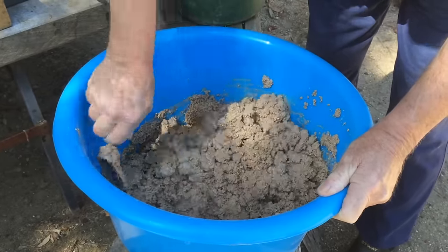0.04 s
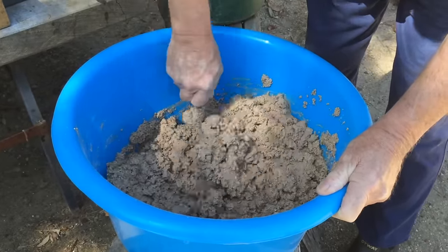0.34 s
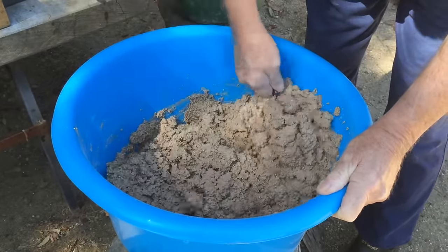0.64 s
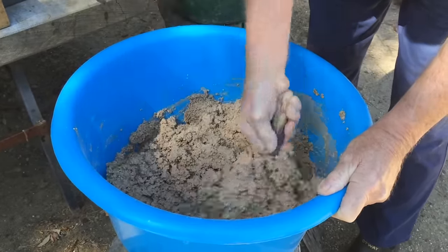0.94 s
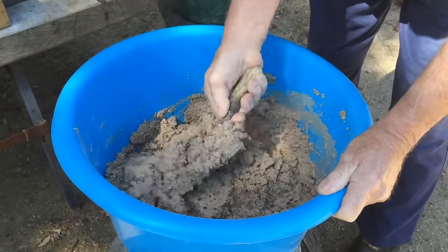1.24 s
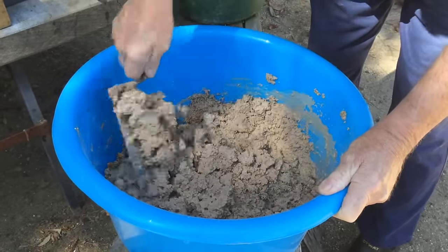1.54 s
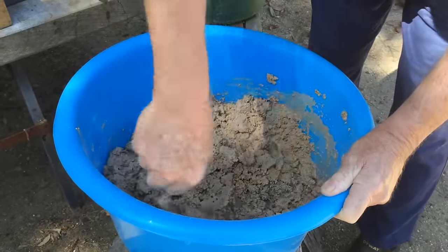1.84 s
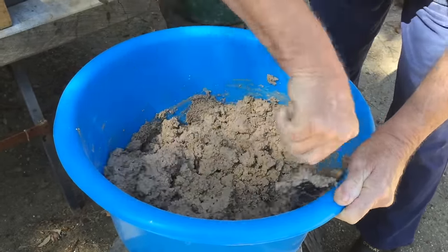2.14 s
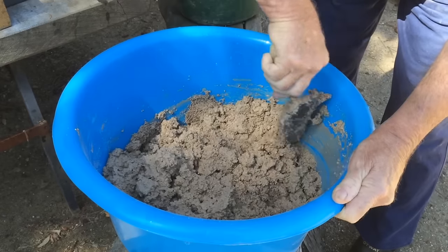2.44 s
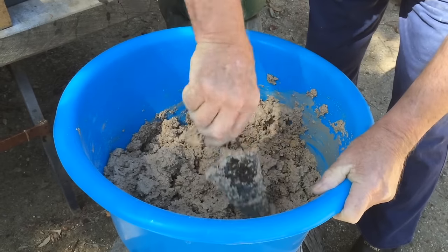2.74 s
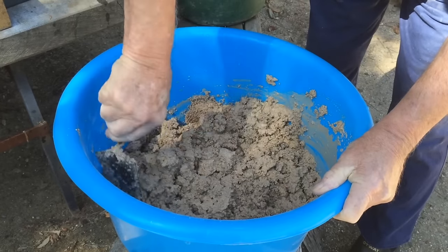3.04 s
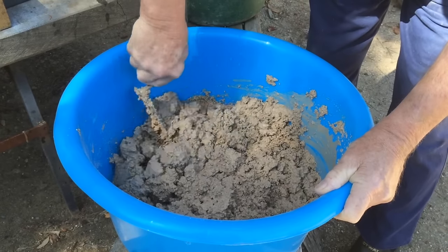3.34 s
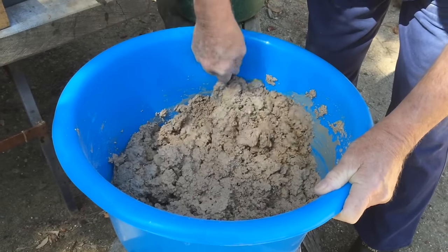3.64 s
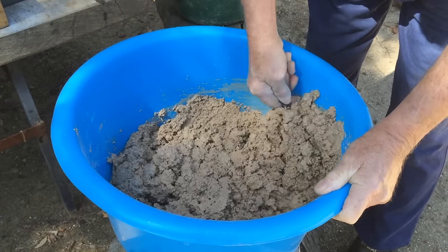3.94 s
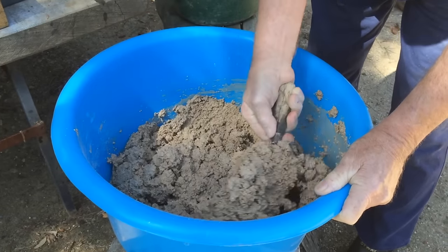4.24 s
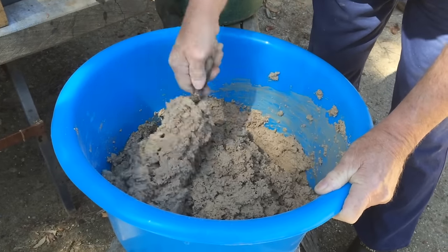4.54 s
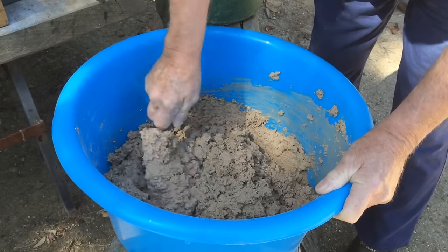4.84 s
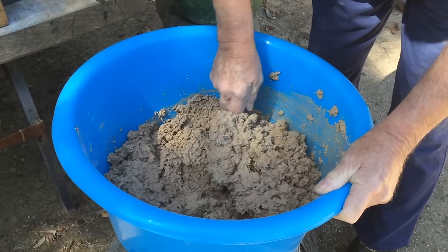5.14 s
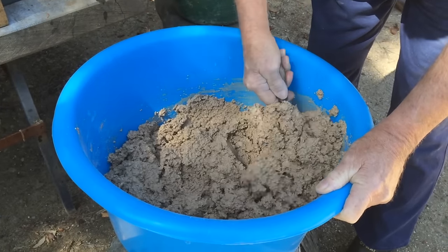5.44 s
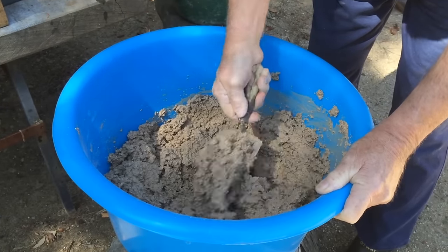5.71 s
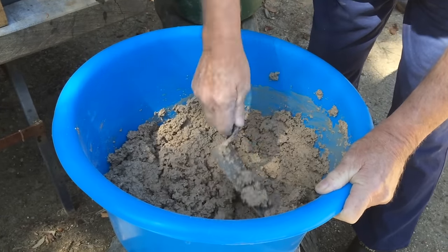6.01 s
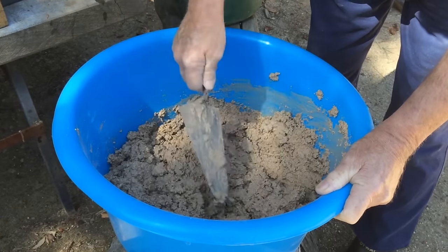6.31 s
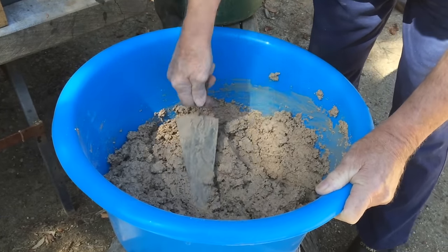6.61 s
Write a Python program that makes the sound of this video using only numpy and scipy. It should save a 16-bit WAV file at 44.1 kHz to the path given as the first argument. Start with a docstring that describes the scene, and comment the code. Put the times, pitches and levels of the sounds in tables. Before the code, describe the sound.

Close up in a quiet yard, a damp sandy mix crunches and hisses softly as a steel trowel turns it in a plastic bowl. The blade knocks the side near the start, then digs and scrapes in irregular pushes, drawing hollow tones from the plastic. Coarse grains snap, and crumbs patter down between strokes. Another clear knock lands shortly before the end. A faint distant rumble lies underneath.

```python
"""A steel trowel turns damp sand and cement in a plastic bowl, close up in a quiet yard.
Grains rush, crunch and snap along the blade; where it drags on the wall, the bowl adds hollow tones.
The edge knocks, catches and scrapes, and crumbs tick down when the blade tips its load.
A faint low rumble lies behind; both channels carry the same sound."""
import sys
import numpy as np
from scipy import signal
from scipy.fft import rfft, irfft, next_fast_len
from scipy.io import wavfile
from scipy.ndimage import uniform_filter1d, map_coordinates

SR = 44100
rng = np.random.default_rng(int(sys.argv[2]) if len(sys.argv) > 2 else 0)


def materialize(psi):
    """Save the field psi as 16-bit PCM at rate SR to the path in sys.argv[1].

    A 1-D psi becomes a single channel; in a 2-D psi each row is a channel.
    """
    bounded = np.clip(np.atleast_2d(psi).T, -1, 1)
    quanta = np.round(bounded * 32767).astype(np.int16)
    wavfile.write(sys.argv[1], SR, quanta)


N = 294131
TOP_HZ = 15420
# modes of the steel blade, damped by the mix: pitch_hz, width_hz, level_db
BLADE_MODES = [(4243, 40, -1), (4620, 45, -8), (4730, 50, -6), (4900, 40, -8), (5300, 60, -2),
               (5690, 45, -6), (6680, 50, -6), (7930, 40, -8)]
# tone of a bursting grain: frequency_hz, level_db
CRACK_SPECTRUM = [(100, -71), (400, 0), (1500, 11), (3200, 4), (7000, 5), (11000, 2), (15500, -1)]


def amp(db):
    """Decibels to gain."""
    return 10 ** (np.asarray(db) / 20)


def unit(x):
    """Scale to rms 1."""
    return x / np.sqrt(np.mean(x ** 2) + 1e-20)


def along(points, hz):
    """Read (frequency_hz, value) points on a log axis."""
    point_hz, values = np.transpose(points)
    return np.interp(np.log(hz + 1), np.log(point_hz), values)


def wobble(rate):
    """A smooth random curve, rate knots a second."""
    knots = rng.standard_normal(int(N * rate / SR) + 4)
    return unit(map_coordinates(knots, [np.arange(N) * rate / SR]))


def filtered(x, response):
    """x through a complex frequency response."""
    size = 2 * next_fast_len(x.shape[-1] // 2 + 4096)
    return irfft(rfft(x, size) * response(np.fft.rfftfreq(size, 1 / SR)), size)[..., :x.shape[-1]]


def coloured(x, spectrum):
    """x through a minimum-phase EQ with this spectrum."""
    def response(hz):
        cepstrum = irfft(np.log(amp(along(spectrum, hz))))
        half = len(cepstrum) // 2
        cepstrum[1:half] *= 2
        cepstrum[half + 1:] = 0
        return np.exp(rfft(cepstrum))
    return filtered(x, response)


def resonate(x, modes):
    """x through (pitch_hz, width_hz, level_db) resonances; neighbours swing in opposite senses."""
    def response(hz):
        return sum((-1) ** k * amp(db) * 1j * hz * width / (pitch ** 2 - hz ** 2 + 1j * hz * width)
                   for k, (pitch, width, db) in enumerate(modes))
    return filtered(x, response)


def add(track, start_s, sound):
    """Mix a sound into the track."""
    start = max(round(start_s * SR), 0)
    track[start:start + len(sound)] += sound[:max(N - start, 0)]


def grains(per_s, spread_db):
    """Random tiny impacts: many small ones and a few large."""
    size = amp(spread_db * np.minimum(rng.exponential(size=N), 4))
    return unit((rng.random(N) < per_s / SR) * size * rng.choice([-1, 1], N))


def crunch(per_s, spread_db, rush_db):
    """Distinct grains over the even rush of countless finer ones."""
    return unit(grains(per_s, spread_db) + amp(rush_db) * rng.standard_normal(N))


def effort(attack_s=0.012, release_s=0.024, brake_s=0.038, restart_s=0.0051):
    """Envelopes of sand, fine grit and wall rubbing: travel plus pushes, ducked as the blade rests."""
    # the blade's steady travel round the bowl: time_s, sand_db, fine_db
    travel = [(0, -70, -63.5), (0.1, -68.5, -77), (0.3, -59.5, -63.5), (1.12, -59, -64), (1.38, -67, -62.5),
              (1.68, -65.5, -65.5), (1.87, -49, -56), (2.7, -62.5, -69.5), (2.96, -62.5, -62.5),
              (3.2, -59, -61), (3.45, -56, -68.5), (4.35, -59.5, -89), (4.62, -60, -60.5),
              (4.8, -63.5, -78), (4.92, -61, -70), (5.75, -57, -63), (6.03, -68, -72), (6.17, -60.5, -60),
              (6.54, -74, -71), (6.67, -62.5, -66)]
    # shoves into the heap: start_s, length_s, sand_db, swell_db, fine_over_sand_db, wall_over_sand_db
    pushes = [(0.126, 0.076, -55.5, 11.5, -5, -3.5), (0.24, 0.2, -58.5, -1.5, -5, 3),
              (0.63, 0.15, -54.5, 0, -19, -3.5), (0.793, 0.292, -58, 3.5, -2, -2),
              (1.732, 0.2, -55, 10, -2.5, 3), (2.007, 0.16, -49.5, -0.5, -2, -0.5),
              (2.17, 0.23, -45.5, 0, -6.5, -10), (2.423, 0.13, -51.5, -5, -8, -10),
              (3.274, 0.042, -59.5, -6, 5, 9.5), (3.483, 0.405, -52.5, 4, -6, 1.5),
              (3.896, 0.17, -55, -1, -20, 0), (5.153, 0.18, -63, -2, -3, -0.5),
              (5.437, 0.11, -56, -2, -12, -5), (5.821, 0.084, -55, -1, -6, -27)]
    # the blade comes to rest: start_s, end_s, duck_db
    stalls = [(0.214, 0.247, -12), (2.85, 2.897, -9.5), (6.377, 6.536, -15)]
    t = np.arange(N) / SR
    time_s, sand_db, fine_db = np.transpose(travel)
    sand, fine = amp(np.interp(t, time_s, sand_db)), amp(np.interp(t, time_s, fine_db))
    wall = sand * amp(-2)
    power = np.array([sand, fine, wall]) ** 2
    for start, length, db, swell_db, fine_over_db, wall_over_db in pushes:
        age = t - start
        press = np.clip(np.minimum(age / attack_s, 1 + (length - age) / release_s), 0, 1)
        push = press * amp(db + swell_db * (np.clip(age / length, 0, 1) - 0.5))
        power += np.outer(amp([0, fine_over_db, wall_over_db]), push) ** 2
    duck_db = sum(db * np.clip(np.minimum((t - start) / brake_s, (end - t) / restart_s), 0, 1)
                  for start, end, db in stalls)
    return np.sqrt(power) * amp(duck_db)


def stirring(sand_gain, fine_gain, wall_gain):
    """The mix gives way in clumps; each clump sheds grains on the blade and tugs at the bowl."""
    # how much the blade crushes rather than slides: time_s, grains_over_rush_db
    coarseness = [(.4, -2), (.8, -8), (1.1, -7), (1.3, 1), (1.95, 1), (2.4, -5), (2.9, 0), (3.9, -1),
                  (4.15, -10), (4.45, -9), (4.6, 0), (5.8, -3), (6.2, -8)]
    # tones of sliding sand and of fine grit: frequency_hz, level_db
    sand_spectrum = [(300, -35), (900, -20.5), (1600, -4), (2400, 2.5), (3100, 2), (4500, 1.5), (6800, 1),
                     (9000, -3.5), (12000, -9), (15500, -7.5)]
    fine_spectrum = [(2500, -18), (6000, 2), (9000, 0.5), (11500, -3), (15500, -8.5)]
    # the wall's hollow tones under the rubbing edge: pitch_hz, width_hz, level_db
    wall_modes = [(253, 57, -10.5), (599, 156, -6), (770, 110, -4), (917, 170, -4), (1297, 203, -2.5),
                  (1564, 138, -2), (1894, 390, -4.5)]
    coarse_db = np.interp(np.arange(N) / SR, *np.transpose(coarseness))
    clumps, slips = wobble(70), wobble(420)
    flow = unit(amp(0.82 * clumps + 0.5 * slips))
    sliding = flow * crunch(per_s=1500, spread_db=4.5, rush_db=-coarse_db)
    sand = unit(coloured(sliding, sand_spectrum)) + amp(-28) * unit(resonate(sliding, BLADE_MODES))
    sifting = flow * crunch(per_s=3000, spread_db=-2, rush_db=-7 - coarse_db)
    fine = unit(coloured(sifting, fine_spectrum))
    tug = amp(clumps + 0.51 * slips)
    rubbing = tug * crunch(per_s=700, spread_db=2.5, rush_db=-coarse_db)
    wall = unit(resonate(rubbing, wall_modes))
    return sand_gain * sand + fine_gain * fine + amp(-3.5) * wall_gain * wall + ploughing(tug)


def crumbs(sand_gain, typical_db=-73, follow=0.32):
    """Loose crumbs tumble off the blade and patter, a little louder when more sand moves."""
    patter = unit(coloured(grains(per_s=120, spread_db=1), CRACK_SPECTRUM))
    return amp(typical_db) * (sand_gain / np.median(sand_gain)) ** follow * patter


def shifting(x, depth_db=2):
    """As the blade turns and the heap changes shape, patches of the spectrum swell and fade."""
    spectra = signal.stft(x, nperseg=512)[2]
    patches = uniform_filter1d(rng.standard_normal(spectra.shape), size=6, axis=0)
    patches = uniform_filter1d(patches, size=9, axis=1)
    gain = unit(amp(depth_db * unit(patches)))
    return signal.istft(spectra * gain, nperseg=512)[1][:N]


def reflections(x, predelay_s=0.005):
    """Nearby walls answer with a short tail, longest in the lows."""
    # decay of the yard: frequency_hz, t60_s
    decay = [(200, 0.3), (1500, 0.084), (10000, 0.095)]
    hz, t, spectra = signal.stft(rng.standard_normal(SR // 3), SR, nperseg=256)
    tail = signal.istft(spectra * amp(-60 * t / along(decay, hz)[:, None]), SR, nperseg=256)[1]
    tail = np.r_[np.zeros(round(predelay_s * SR)), tail]
    return signal.fftconvolve(x, tail / np.linalg.norm(tail))[:N]


def yard():
    """A steady bed of distant rumble with a little hiss."""
    # tone of the yard's air: frequency_hz, level_db
    air_spectrum = [(20, -25.5), (35, -11), (50, -10.5), (72, 3), (100, -7), (150, -14.5), (300, -17),
                    (600, -20), (1200, -31), (2600, -31.5), (7000, -39.5), (15500, -43)]
    return amp(-65.5) * unit(coloured(rng.standard_normal(N), air_spectrum))


def catches(wall_gain, per_s=12, length_s=0.06, centre_hz=1360, scatter=0.1, width_hz=220):
    """Cues for light scrapes: the edge catches by chance, as strongly as it rubs the wall just then."""
    slots = np.arange(int(per_s * N / SR))
    chance = rng.random((len(slots), 2))
    times = (slots + chance[:, 0]) / per_s
    pitches = centre_hz * np.exp(scatter * (2 * chance[:, 1] - 1))
    return [(start, length_s, 20 * np.log10(wall_gain[int(start * SR)]) - 8.5, hz, width_hz)
            for start, hz in zip(times, pitches)]


def scrapes(wall_gain, fade_s=0.002):
    """Brief stick-slip bursts, each in the band that the edge's angle picks; the blade sings along."""
    # the edge judders along the wall: start_s, length_s, level_db, centre_hz, nominal_width_hz
    cues = [(0.252, 0.01, -49, 8100, 500), (0.247, 0.023, -49.5, 12000, 7000),
            (0.732, 0.0235, -49, 1660, 1200), (1.857, 0.052, -56.5, 653, 70),
            (2.021, 0.025, -53.5, 695, 90), (2.073, 0.0089, -47, 1920, 400),
            (2.213, 0.019, -48, 1800, 1400), (2.329, 0.015, -45.5, 2400, 2200),
            (2.358, 0.033, -34, 5160, 4170), (2.359, 0.034, -45, 1800, 696),
            (2.361, 0.075, -44.5, 11600, 8100), (2.541, 0.016, -48.5, 1460, 900),
            (2.899, 0.016, -62, 1750, 500), (3.002, 0.031, -48.5, 1490, 800),
            (3.506, 0.029, -44, 6030, 1610), (3.509, 0.024, -48.5, 1180, 1000),
            (3.562, 0.1, -58, 1400, 280), (3.707, 0.058, -54, 1360, 450), (3.871, 0.015, -48, 5600, 8950),
            (5.186, 0.031, -51, 2050, 600), (5.495, 0.085, -61, 1500, 400), (5.778, 0.069, -65, 1290, 160)]
    out = np.zeros(N)
    judder = rng.standard_normal(N) * amp(1.1 * wobble(600))
    for start, length, db, centre_hz, width_hz in cues + catches(wall_gain):
        t = np.arange(int((length + 0.03) * SR)) / SR
        press = np.clip(np.minimum(t, length - t) / fade_s, 0, 1)
        slipping = press * judder.take(round(start * SR) + np.arange(len(t)), mode="wrap")
        band = [(centre_hz, 1.4 * width_hz, 0)]  # set wide, as two passes narrow it
        rasp = resonate(resonate(slipping, band), band)
        rasp = rasp + amp(2) * resonate(rasp, BLADE_MODES)
        add(out, start, amp(db) * rasp * np.linalg.norm(press) / np.linalg.norm(rasp))
    return out


def crack(t60_s):
    """A grain bursts in a bright puff of noise."""
    t = np.arange(SR // 5) / SR
    puff = coloured(rng.standard_normal(len(t)) * amp(-60 * t / t60_s), CRACK_SPECTRUM)
    return puff / np.sqrt(np.sum(puff ** 2) / (t60_s * SR)) / 10


def snaps():
    """Single coarse grains click between steel and plastic."""
    # grains snapping under the blade: start_s, level_db
    cues = [(0.0782, -42), (1.641, -42), (1.991, -28.5), (2.217, -33), (2.381, -40), (2.9006, -43),
            (3.365, -38), (3.981, -41), (6.542, -40)]
    out = np.zeros(N)
    for start, db in cues:
        add(out, start, amp(db) * crack(t60_s=0.0092))
    return out


def knocks(t60_cycles=15.2, attack_s=0.00027, rebound_s=0.0032, rebound_pitch=0.782):
    """A blow slaps the wall, rings the bowl and crushes grit; the springy blade lands again, softer."""
    # blade hits, levels ahead of the mix trims below:
    # start_s, slap_db, pitch_hz, ring_db, hardness_hz, grit_db, rebound_db
    hits = [(0.204, -13.5, 805, -16.5, 670, -31, -14.5), (0.2489, -31, 925, -34, 450, -33, -11),
            (0.2901, -39, 905, -36, 900, -35, -12), (0.3208, -26.5, 1640, -28, 800, -50, -11),
            (0.384, -33, 1070, -35.5, 500, -47, -3), (0.722, -30, 1700, -31, 700, -29, -17),
            (0.761, -39, 520, -36, 400, -51, -22), (1.073, -36.5, 774, -67, 1200, -43, -15),
            (1.7775, -44, 493, -48, 600, -31, -12), (1.839, -32, 1650, -50, 1500, -46, -15),
            (1.932, -31, 1190, -45, 1500, -50, -10), (2.051, -37, 620, -44, 700, -38, -16),
            (3.0054, -23.5, 1820, -29.5, 800, -29, -7.5), (3.270, -37, 1440, -30.5, 400, -34.5, -9),
            (3.4852, -28, 620, -27.5, 1700, -48, -20), (3.5667, -33, 1890, -35.5, 800, -40, -4),
            (4.0382, -27, 1390, -51, 2000, -37, -17), (4.0495, -22.5, 1350, -51, 2000, -51, -12),
            (5.210, -33, 1030, -38, 600, -36, -27), (5.265, -48, 282, -53, 280, -60, -9),
            (6.1268, -23, 1370, -8.5, 1340, -17, -1.5), (6.146, -53, 1500, -37, 1200, -31, -10)]
    # modes of the plastic bowl: pitch_hz, width_hz, level_db
    bowl_modes = [(185, 64, -32), (252, 60, -4), (344, 48, -7.5), (458, 110, -6), (594, 93, -3),
                  (698, 95, -6), (945, 90, 0), (1270, 170, 2.5), (1554, 130, 2), (2070, 68, -4),
                  (2340, 65, -0.5), (2700, 36, -24), (2984, 44, 4), (3470, 130, 3.5)]
    out, t = np.zeros(N), np.arange(SR // 5) / SR
    mode_hz, width_hz, mode_db = np.transpose(bowl_modes)
    modes = np.sin(2 * np.pi * mode_hz[:, None] * t) * np.exp(-np.pi * width_hz[:, None] * t)
    onset = 1 - np.exp(-t / attack_s)
    usual_grit_db = np.median(hits, axis=0)[5]
    for start, slap_db, pitch_hz, ring_db, hardness_hz, grit_db, rebound_db in hits:
        # a heavier blow crushes coarser, duller grit
        cutoff_hz = min(15000 * amp(0.3 * (usual_grit_db - grit_db)), TOP_HZ)
        muffle = signal.butter(3, cutoff_hz, fs=SR, output="sos")
        # on the rebound the bowl, already pressed, hardly rings again
        contacts = [(0, 1, 1, 1), (rebound_s, amp(rebound_db), rebound_pitch, amp(-8.5))]
        for delay, gain, pitch_ratio, ring_gain in contacts:
            cycles = pitch_ratio * pitch_hz * t
            slap = np.sin(2 * np.pi * cycles) * amp(-60 * cycles / t60_cycles)
            # the mix cushions the high modes; each spot weights the modes anew
            cushion = 1 + (mode_hz / (pitch_ratio * hardness_hz)) ** 2
            weights = amp(mode_db + 2.2 * rng.standard_normal(len(mode_hz))) * width_hz / cushion
            ring = ring_gain * weights @ modes / np.linalg.norm(weights)
            plastic = (amp(slap_db - 3) * slap + amp(ring_db - 4.5) * ring) * onset
            grit = amp(grit_db + 1) * signal.sosfilt(muffle, crack(t60_s=0.014))
            add(out, start + delay, gain * (plastic + grit))
    # long waves slip round the open bowl instead of radiating
    return signal.sosfilt(signal.butter(3, 168, "highpass", fs=SR, output="sos"), out)


def ploughing(tug, fade_s=0.0037):
    """The blade digs down and the tugging clumps make the bowl's bottom rumble."""
    # deep strokes: start_s, end_s, level_db
    strokes = [(0.227, 0.254, -51.5), (0.317, 0.363, -50), (1.79, 2.12, -71.5), (3.286, 3.31, -75),
               (3.6, 3.797, -60.5), (3.83, 3.941, -63), (5.016, 5.228, -66)]
    # tone of the bowl's bottom: frequency_hz, level_db
    bottom_spectrum = [(90, -43), (170, 0), (255, 3), (330, -7.5), (450, -10.5), (620, -2), (800, -4.5),
                       (1200, -28.5)]
    t = np.arange(N) / SR
    depth = sum(amp(db) * np.clip(np.minimum(t - start, end - t) / fade_s, 0, 1)
                for start, end, db in strokes)
    return depth * unit(coloured(tug * crunch(per_s=180, spread_db=1, rush_db=-9), bottom_spectrum))


def spills(drops_per_s=24, centre_hz=8100, pitch_scatter=0.26):
    """Crumbs drop off the tipped blade and tick unevenly, each with the pitch of its size."""
    # the blade tips its load: start_s, end_s, typical_peak_db
    tips = [(1.28, 1.62, -46.5), (2.571, 2.8, -47), (4.555, 4.84, -60)]
    out = np.zeros(N)
    for start, end, db in tips:
        for slot_s in np.arange(start, end, 1 / drops_per_s):
            hz = centre_hz * np.exp(pitch_scatter * rng.standard_normal())
            tick = resonate(crack(t60_s=0.019), [(hz, hz, 0)])
            landing_s = slot_s + rng.random() / drops_per_s
            add(out, landing_s, amp(db + rng.standard_normal()) * tick / np.abs(tick).max())
    return out


def scene():
    """Trowel and bowl in the yard, heard alike on both sides."""
    sand_gain, fine_gain, wall_gain = effort()
    texture = shifting(stirring(sand_gain, fine_gain, wall_gain) + crumbs(sand_gain))
    trowel = texture + knocks() + snaps() + scrapes(wall_gain) + spills()
    mono = trowel + amp(-19) * reflections(trowel) + yard()
    return np.array([mono, mono])


def record(dry):
    """A brick-wall low-pass takes off the very top."""
    return filtered(dry, lambda hz: hz < TOP_HZ)


dry = scene()
out = record(dry)
materialize(out)
```